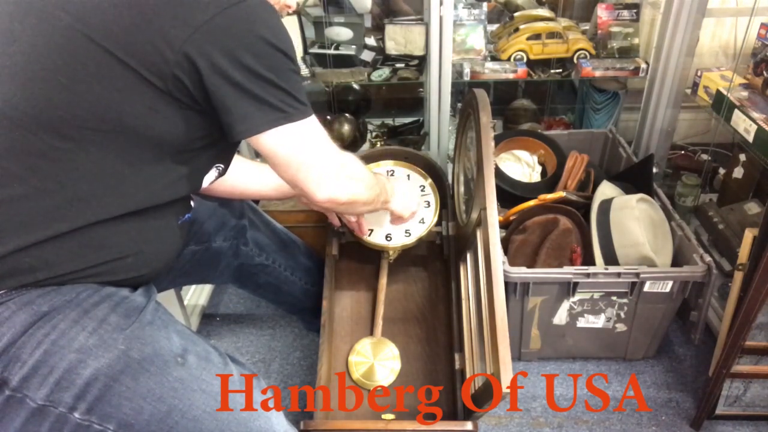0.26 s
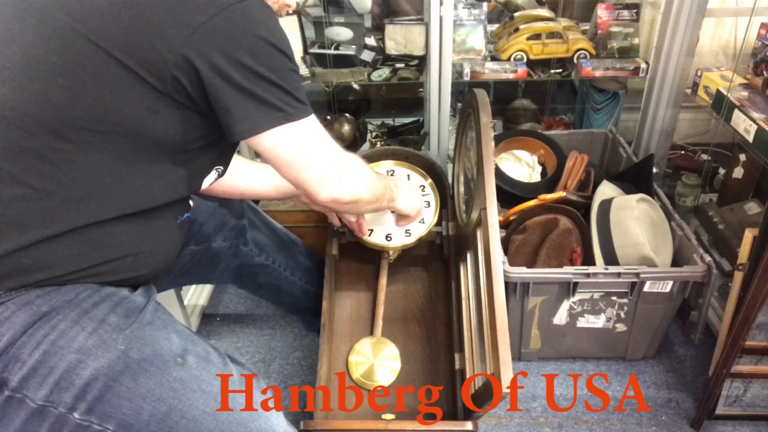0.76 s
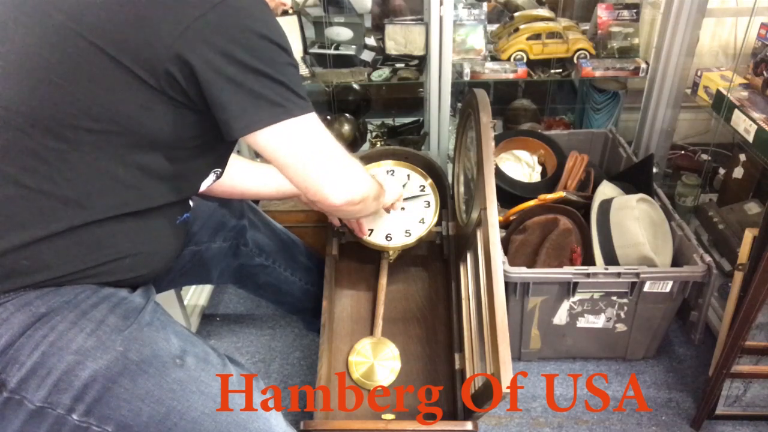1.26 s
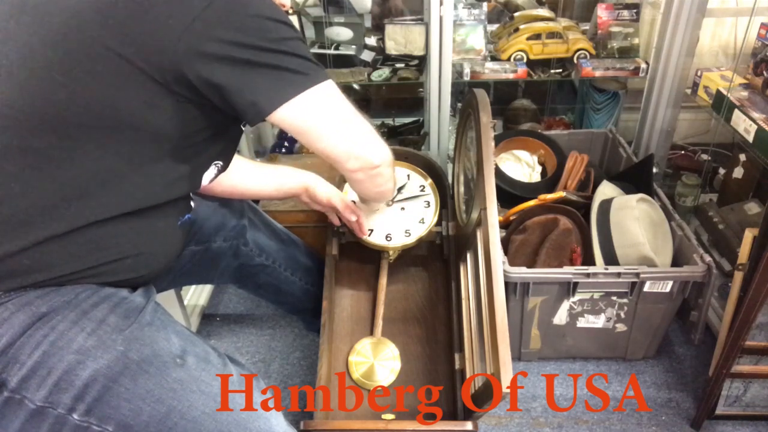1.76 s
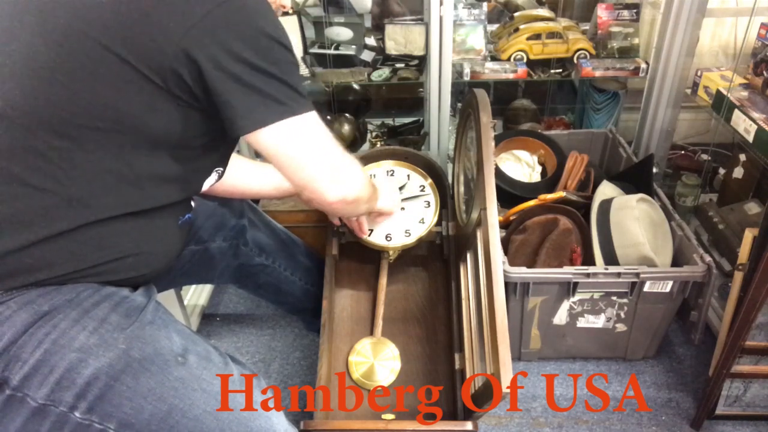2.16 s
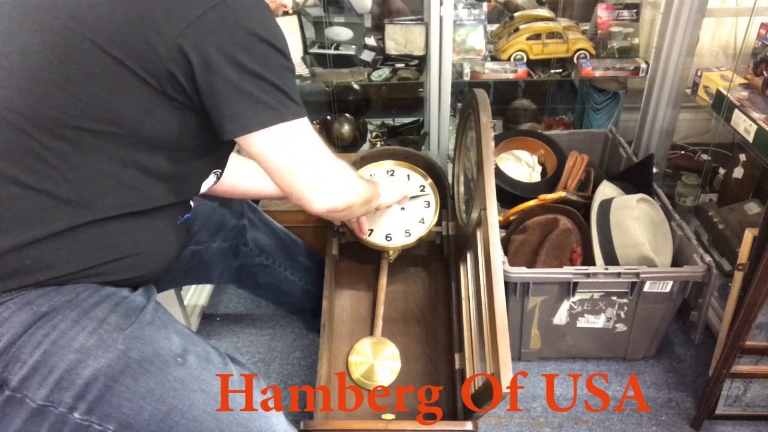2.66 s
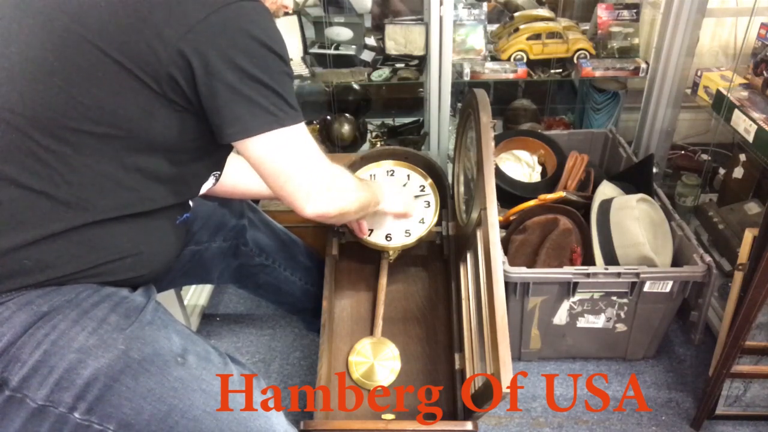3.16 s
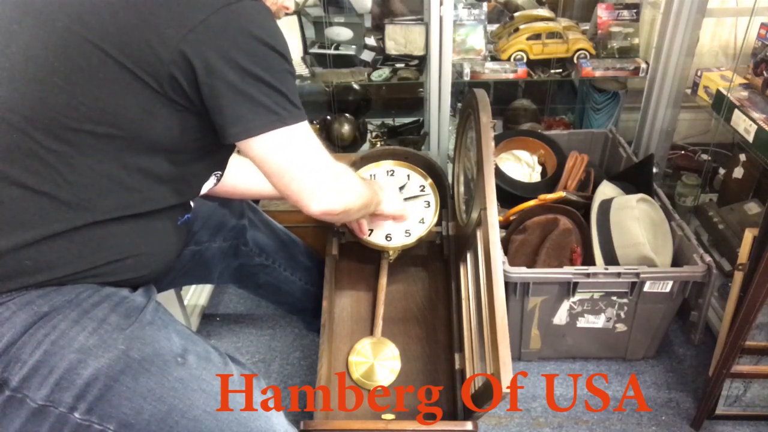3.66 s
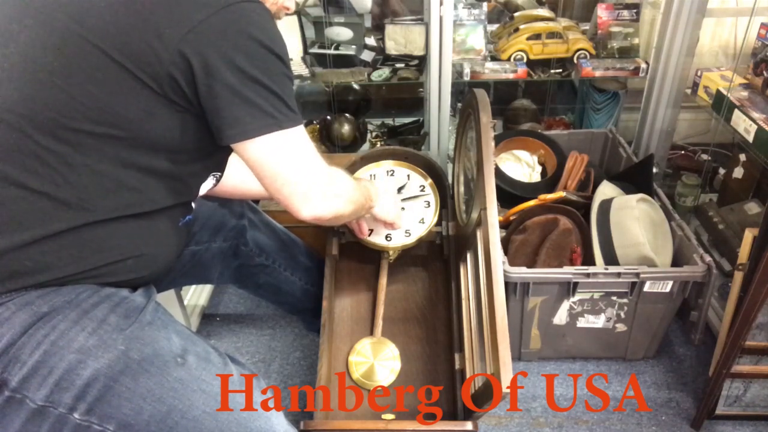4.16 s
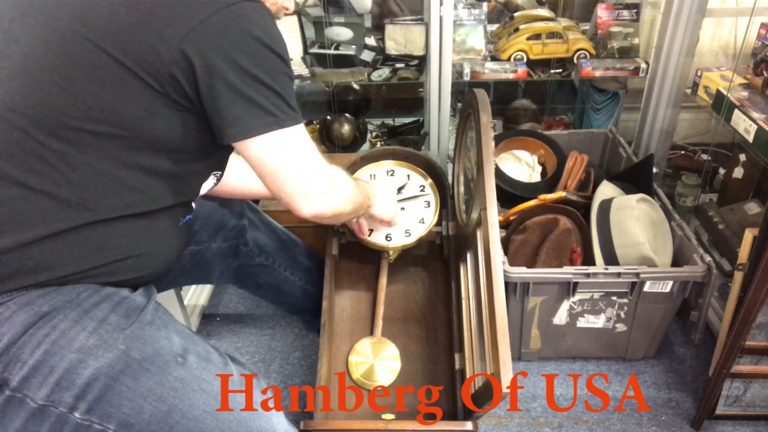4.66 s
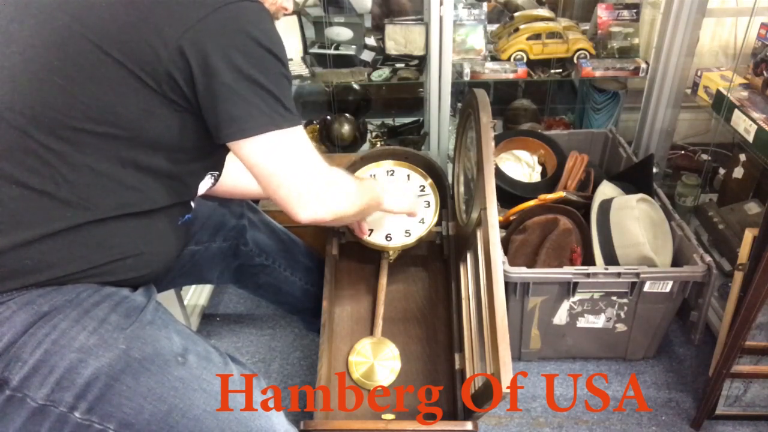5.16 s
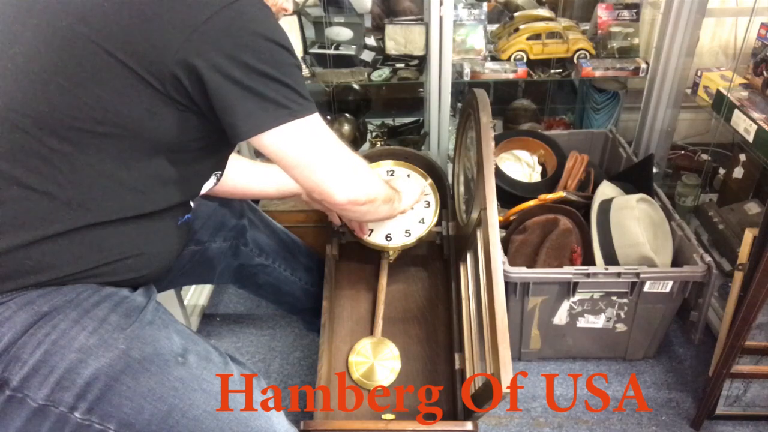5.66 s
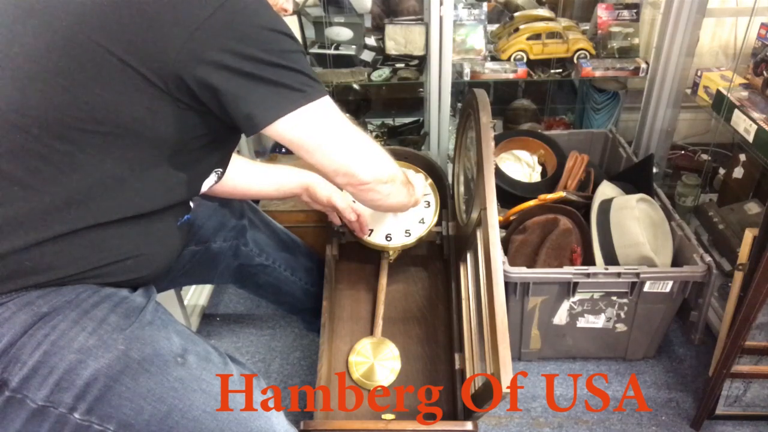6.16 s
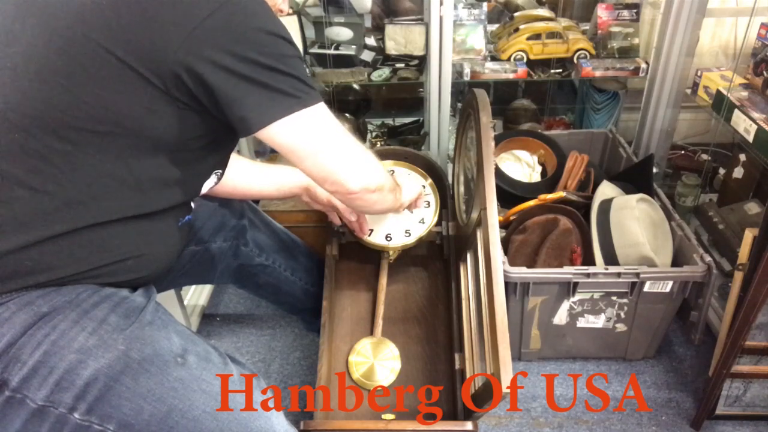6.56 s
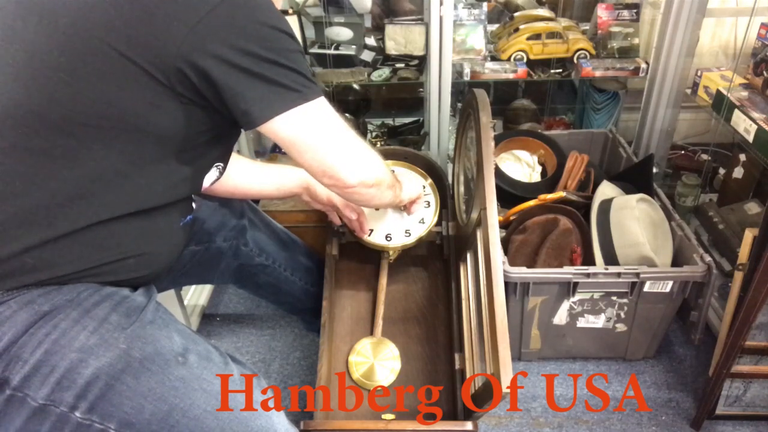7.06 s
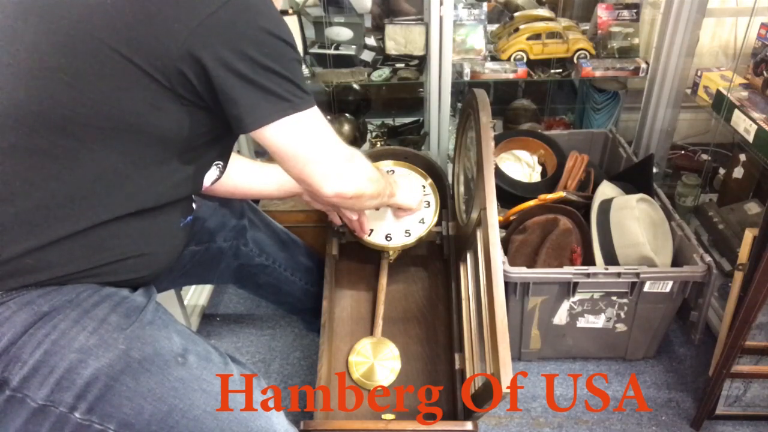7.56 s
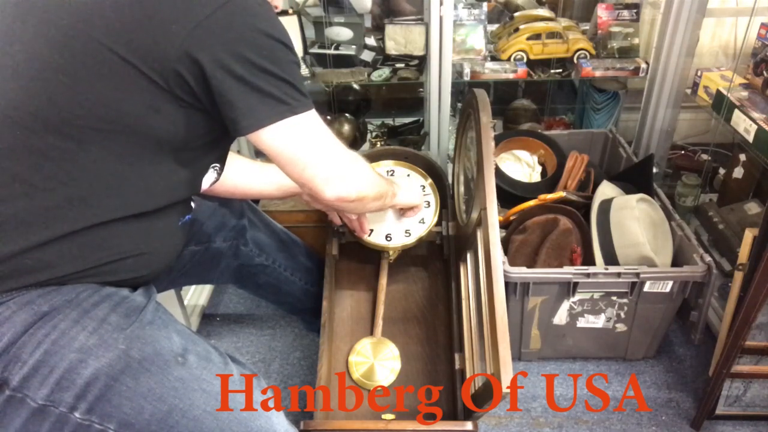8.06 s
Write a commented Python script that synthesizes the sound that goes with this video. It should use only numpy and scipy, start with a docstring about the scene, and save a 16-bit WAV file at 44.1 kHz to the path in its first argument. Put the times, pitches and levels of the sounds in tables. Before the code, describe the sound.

A wooden wall clock is wound with a key in a small room, over a faint ventilation hum. In the first half second come three slow, sharp ratchet clicks with a slight steel ring. Soft thuds and knocks on the hollow case, key taps and a tiny squeak follow until about 1.9 seconds. Then come three quick runs of drier clicks, seven or eight each, at about 2 to 2.4, 2.8 to 3 and 3.5 to 3.8 seconds. From 4 to 7 seconds it is quieter: the loose key taps in its socket, fingers rub lightly, and brief squeaks sound near 5.6 and 6.4 seconds, with a few faint low thuds around 6.5. Two more sharp single clicks come at 7.3 and 7.6 seconds, a wooden knock at 7.8, and light key taps and squeaks just after 8 seconds.

```python
"""Winding a wall clock.

A wooden clock on a shop floor is wound with a key: right arbor, left, then right again.
Each spring's pawl snaps over its ratchet teeth. Between turns the key rattles and squeaks in its
socket, fingers rub and the wrist bumps the case. The small room rings briefly; ventilation hums."""
import sys
import numpy as np
from scipy import signal
from scipy.fft import rfft, irfft, next_fast_len
from scipy.io import wavfile
from scipy.ndimage import uniform_filter1d, map_coordinates

SR = 44100
rng = np.random.default_rng(int(sys.argv[2]) if len(sys.argv) > 2 else 0)


def wav_record(signal):
    """Record a signal, one row per channel, as 16-bit PCM in the file named by sys.argv[1]."""
    frames = np.transpose(np.atleast_2d(signal))
    bounded = np.clip(frames, -1, 1)
    # unit amplitude maps onto the largest positive 16-bit level
    quanta = np.round(bounded * 32767).astype(np.int16)
    wavfile.write(sys.argv[1], SR, quanta)


N = 366471
HIT_SIZE = 2 ** 14
TIME_S = np.arange(N) / SR
HIT_S = np.arange(HIT_SIZE) / SR
HIT_HZ = np.fft.rfftfreq(HIT_SIZE, 1 / SR)

# Table levels are relative; each source adds its own gain.
# ventilation envelopes: (time [s], level [dB])
DRONE_ENVELOPE = [(0.0, -71), (0.23, -44.5), (0.32, -60), (1.64, -60), (2.03, -43), (2.27, -56),
                  (2.59, -50.5), (2.92, -69.5), (3.12, -55.5), (3.98, -63), (4.53, -50), (6.02, -60.5),
                  (6.06, -47), (7.1, -52), (7.36, -65), (7.5, -49.5), (8.19, -56), (8.31, -66)]
RUMBLE_ENVELOPE = [(0, -66), (4, -68), (6.2, -70), (6.45, -48.5), (6.7, -61.5), (8.3, -67)]
# ventilation hum: (frequency [Hz], level [dB])
HUM_LINES = [(99.9, -62.5), (136.2, -62.5), (219.8, -65.5), (391, -73.5), (511, -76.5)]
# pawl snaps, one per tooth: (time [s], level [dB])
RIGHT_SNAPS = [(0.093, -17), (0.248, -17.5), (0.461, -17.5), (7.313, -17.5), (7.575, -17)]
LEFT_SNAPS = [(1.962, -16.5), (2.026, -17.5), (2.076, -19.5), (2.143, -19), (2.209, -19.5), (2.256, -19.5),
              (2.303, -19.5), (2.398, -18), (2.769, -17.5), (2.808, -17), (2.848, -16.5), (2.882, -17),
              (2.91, -18.5), (2.95, -19), (2.992, -19), (3.456, -16.5), (3.565, -15.5), (3.591, -16.5),
              (3.621, -16.5), (3.669, -16.5), (3.715, -16.5), (3.755, -18.5), (3.811, -19.5)]
# case tipping: (time [s], level [dB])
CASE_TIPS = [(0.103, -31), (0.158, -33.5), (0.356, -34.5), (0.607, -29), (0.827, -31.5), (1.836, -33.5),
             (6.391, -43.5), (6.6, -43.5), (6.705, -42.5), (7.869, -40)]
# blows on the case, key in its socket: (time [s], level [dB], hardness [dB of treble])
CASE_KNOCKS = [(0.35, -36, -3), (0.6, -34.5, 3.5), (0.798, -32.5, 6), (1.656, -33, -8), (1.828, -30, 3),
               (4.796, -46.5, -21), (6.384, -39.5, -20), (7.843, -27.5, -1)]
SOCKET_TAPS = [(0.396, -46, 10), (0.941, -40.5, 2.5), (0.955, -40.5, 0), (0.974, -47, 8), (1.331, -35.5, 4),
               (1.365, -36, -1), (1.395, -39, -4), (1.78, -34, -6), (1.795, -34, -10.5), (2.714, -39, -2),
               (4.005, -46, -6), (4.827, -46.5, -11.5), (5.012, -33.5, 1.5), (5.545, -41, 4.5),
               (5.579, -39, 4), (5.71, -42.5, -9), (5.878, -49, 15), (6.371, -48.5, 0), (6.698, -46.5, -11),
               (8.029, -44.5, 2.5), (8.117, -36.5, 5.5), (8.186, -39.5, -1.5), (8.229, -43, 4)]
# key slipping: (time [s], level [dB], pitch [Hz])
KEY_SQUEAKS = [(0.943, -37.5, 1355), (0.968, -45, 1714), (5.546, -49, 1460), (5.577, -40.5, 1364),
               (5.579, -41, 1746), (5.709, -49, 1820), (6.372, -48.5, 1870), (6.696, -57, 1810),
               (8.187, -42.5, 1714), (8.229, -42.5, 1685)]
# noise and contact spectra: (frequency [Hz], level [dB])
AIR_SPECTRUM = [(25, -52), (53, -12.5), (76, -13.5), (110, -18.5), (165, -19.5), (240, -16.5), (360, -24),
                (520, -26), (700, -31.5), (1130, -33), (3000, -44.5), (4800, -49), (6500, -48.5),
                (9000, -56), (15800, -56)]
RIGHT_SPECTRUM = [(150, -39.5), (330, -20.5), (500, -1), (900, -7.5), (1400, -1.5), (2100, -1),
                  (2700, -10.5), (3700, 3.5), (5000, 2), (6800, -1.5), (9600, -6.5), (10500, -16),
                  (12500, -4), (15800, -7.5)]
THUD_SPECTRUM = [(90, -28), (185, -10), (240, -0.5), (300, -6.5), (450, -11.5), (800, -20), (2000, -42.5),
                 (6000, -58.5)]
CASE_SPECTRUM = [(90, -18.5), (220, 0.5), (520, -2.5), (900, -7.5), (1800, -11.5), (3200, -12.5),
                 (6000, -21.5), (10000, -36), (15000, -36)]
RUB_SPECTRUM = [(150, -12), (500, 5), (1000, 2), (1700, -0.5), (3000, -9.5), (6000, -22), (10000, -36),
                (15800, -42)]
KEY_SPECTRUM = [(150, 2), (450, 1), (900, -3), (1600, -3.5), (2400, -10), (4500, -11), (7000, -20),
                (10000, -29.5), (15000, -31)]
LEFT_SPECTRUM = [(150, -18), (330, -12.5), (500, -6.5), (900, 0), (1400, -5), (2100, 0), (3000, 4.5),
                 (4600, 1), (5800, 0), (7400, 0.5), (9600, -5.5), (10500, -10), (12500, -0.5), (15800, -5)]
RUMBLE_SPECTRUM = [(20, -36.5), (42, -14), (56, 4.0), (75, -6.5), (130, -29.5), (400, -70)]
# ringing modes: (frequency [Hz], level [dB], T60 [s])
RIGHT_PAWL_MODES = [(405, -19, .1), (517, -9, .09), (1010, -20, .12), (1290, -18, .07), (1530, -19, .18),
                    (1670, -14, .14), (1910, -11, .08), (2100, -12, .07), (3480, -13, .08), (3740, -13, .1),
                    (4160, -18, .14), (4860, -13, .1), (5020, -7, .07), (5085, -9, .13), (5140, -10, .18),
                    (5215, -9, .14), (6130, -17, .08), (9150, -11, .05), (9790, -14, .06),
                    (13900, -15, .06)]
WOOD_MODES = [(228, -11, .15), (250, -14, .12), (284, -8, .16), (385, -15, .1), (410, -11, .1),
              (518, -4, .09)]
SOCKET_MODES = [(500, -5.5, .08), (1408, -22, 0.029), (1700, -12, 0.023)]
LEFT_PAWL_MODES = [(278, -21, .13), (400, -19, .08), (519, -14, .1), (940, -14, .08), (1008, -17, .12),
                   (1697, -12, .08), (2200, -12.5, .07), (2530, -16, .1), (2780, -11, .08), (2900, -3, .02),
                   (3026, -10, .08), (3150, -6.5, .025), (3530, -16, .07), (3740, -17, .1),
                   (4395, -12, .07), (4496, -15, .09), (4620, -1, .02), (4676, -11, .07), (5250, -9, .03)]
# room decay: (frequency [Hz], T60 [s])
ROOM_DECAY = [(150, 0.51), (500, 0.51), (1500, 0.35), (4500, 0.27), (9000, 0.25), (15000, 0.19)]


def amp(db):
    """Decibels to gain."""
    return 10 ** (np.asarray(db) / 20)


def unit(x):
    """Scale to rms 1."""
    return x / np.sqrt(np.mean(x ** 2) + 1e-20)


def along(points, hz):
    """Interpolate (frequency [Hz], value) points on a log axis."""
    knots_hz, values = np.transpose(points)
    return np.interp(np.log(hz + 1), np.log(knots_hz), values)


def wobble(rate_hz, size=N):
    """Smooth random curve, rate_hz knots per second."""
    knots = rng.standard_normal(int(size * rate_hz / SR) + 4)
    return map_coordinates(knots, [TIME_S[:size] * rate_hz])


def filtered(x, gain):
    """Zero-phase filter with response gain(hz)."""
    size = next_fast_len(N + HIT_SIZE)
    return irfft(rfft(x, size) * gain(np.fft.rfftfreq(size, 1 / SR)), size)[:N]


def noise(spectrum):
    """Steady shaped noise, rms 1."""
    return unit(filtered(rng.standard_normal(N), lambda hz: amp(along(spectrum, hz))))


def minimum_phase(db):
    """Causal response with these levels on HIT_HZ."""
    cepstrum = irfft(np.log(amp(db)))
    cepstrum[1:HIT_SIZE // 2] *= 2
    cepstrum[HIT_SIZE // 2 + 1:] = 0
    return np.exp(rfft(cepstrum))


def add(track, start_s, sound):
    """Mix a sound into the track."""
    part = track[max(round(start_s * SR), 0):][:len(sound)]
    part += sound[:len(part)]


def in_room(hit, wet_db):
    """Hit plus room tail; treble dies first."""
    hz, time_s, bins = signal.stft(rng.standard_normal(HIT_SIZE), SR, nperseg=256)
    decay = amp(-60 * time_s / along(ROOM_DECAY, hz)[:, None])
    tail = signal.istft(bins * decay, SR, nperseg=256)[1]
    tail *= 1 - np.exp(-(HIT_S / 0.0044) ** 2)
    return hit + amp(wet_db) * signal.fftconvolve(hit, tail / np.linalg.norm(tail))[:HIT_SIZE]


def strike(response_db, chatter, rise_s, t60_s, edge_t60_s, lag_s):
    """One contact: decaying chatter, shortest in the treble; loudest 5 ms at rms 1."""
    attack = 1 - np.exp(-(HIT_S / rise_s) ** 2)
    body, edge = (rfft(chatter * attack * amp(-60 * HIT_S / decay_s)) / np.sqrt(decay_s)
                  for decay_s in (t60_s, edge_t60_s))
    treble = along([(1500, 0), (11000, 1)], HIT_HZ)
    # bending waves are slower in the bass; lag_s is their delay at 1 kHz
    bending = np.exp(-4j * np.pi * lag_s * np.sqrt(1000 * HIT_HZ))
    hit = irfft(((1 - treble) * body + treble * edge) * minimum_phase(response_db) * bending)
    return hit / np.sqrt(uniform_filter1d(hit ** 2, size=220).max())


def ring(modes, tilt, rise_s):
    """Modes as decaying sines, varied per blow; low ones build up slower (rise_s at 1 kHz)."""
    total = np.zeros(HIT_SIZE)
    for hz, db, t60_s in modes:
        age_s = HIT_S[HIT_S < t60_s]
        swell = 1 - np.exp(-(age_s / rise_s) ** 2 * hz / 1000)
        level_db = db + along(tilt, hz) + rng.normal(0, 0.84) - 60 * age_s / t60_s
        total[:len(age_s)] += amp(level_db) * swell * np.sin(2 * np.pi * (hz * age_s + rng.random()))
    return total


def contacts(blows, spectrum, modes, tilt_hz, body_db, edge_db, scatter_db, thinning,
             ring_db, repeat_share, wet_db, **timing):
    """Repeated blows on one object; harder ones have more edge and a thinner body."""
    track = np.zeros(N)
    # the same parts meet each time, so some chatter repeats
    repeated = np.sqrt(repeat_share) * rng.standard_normal(HIT_SIZE)
    for start_s, db, *hardness_db in blows:
        hard_db = (hardness_db[0] if hardness_db else 0) + scatter_db * rng.standard_normal()
        chatter = repeated + np.sqrt(1 - repeat_share) * rng.standard_normal(HIT_SIZE)
        tilt = list(zip(tilt_hz, [body_db - thinning * hard_db, 0, 0, edge_db + hard_db]))
        snap = strike(along(spectrum, HIT_HZ) + along(tilt, HIT_HZ), chatter, **timing)
        ringing = amp(ring_db) * ring(modes, tilt, rise_s=0.0026)
        add(track, start_s, amp(db) * in_room(snap + ringing, wet_db))
    return track


def ventilation():
    """Air noise, fluttering deep drone, hum lines and a low rumble that swells once."""
    def tone(hz, waver_rad):
        return np.sqrt(2) * np.sin(2 * np.pi * hz * TIME_S + waver_rad * wobble(5.2))

    drone_db = np.interp(TIME_S, *np.transpose(DRONE_ENVELOPE)) + 3.5 * wobble(rate_hz=9)
    drone = amp(drone_db - 1.5) * tone(hz=72.4, waver_rad=0.71)
    hum = sum(amp(db + 1.1 * wobble(3.01)) * tone(hz, waver_rad=0.44) for hz, db in HUM_LINES)
    rumble = amp(np.interp(TIME_S, *np.transpose(RUMBLE_ENVELOPE))) * noise(RUMBLE_SPECTRUM)
    return amp(-58) * noise(AIR_SPECTRUM) + drone + hum + rumble


def right_pawl():
    """Slow single clicks; the steel pawl rings on near 5 kHz."""
    return amp(-8) * contacts(
        RIGHT_SNAPS, RIGHT_SPECTRUM, RIGHT_PAWL_MODES, tilt_hz=(900, 2000, 6000, 10000),
        body_db=2.2, edge_db=5.5, scatter_db=2.04, thinning=0.3,
        ring_db=-3.5, repeat_share=0.26, wet_db=-9.5,
        rise_s=0.0024, t60_s=0.077, edge_t60_s=0.021, lag_s=0.001152)


def case_thuds(settle_s=0.035, settle_loss_db=12.5):
    """The case tips under the hands with a low thud, then settles back more softly."""
    track = np.zeros(N)
    settles = [(start_s + settle_s, db - settle_loss_db) for start_s, db in CASE_TIPS]
    for start_s, db in CASE_TIPS + settles:
        thud = strike(along(THUD_SPECTRUM, HIT_HZ), rng.standard_normal(HIT_SIZE),
                      rise_s=0.0011, t60_s=0.1, edge_t60_s=0.04, lag_s=0.001017)
        thud += amp(11) * ring(WOOD_MODES, THUD_SPECTRUM, rise_s=0.0037)
        add(track, start_s, amp(db - 7.5) * in_room(thud, wet_db=-7))
    return track


def case_knocks():
    """The wrist bumps the hollow wooden case; its low modes ring."""
    return amp(-6.5) * contacts(
        CASE_KNOCKS, CASE_SPECTRUM, WOOD_MODES, tilt_hz=(350, 600, 1300, 3500),
        body_db=-0.2, edge_db=-8, scatter_db=1.4, thinning=0.16,
        ring_db=5, repeat_share=0.05, wet_db=-6.5,
        rise_s=0.00081, t60_s=0.077, edge_t60_s=0.048, lag_s=0.00044)


def dial_rubs(lag_s=0.011, half_width_s=0.016, gain_db=-19):
    """Fingers and key slide on the dial at each tap or knock: tiny slips under a pressure swell."""
    pressure = sum(amp(db + gain_db) * np.exp(-((TIME_S - start_s - lag_s) / half_width_s) ** 2)
                   for start_s, db, _ in SOCKET_TAPS + CASE_KNOCKS)
    slips = noise(RUB_SPECTRUM) * amp(1.9 * wobble(rate_hz=350))
    return pressure * unit(slips)


def key_taps():
    """The loose key taps the arbor as the grip changes."""
    return amp(-8) * contacts(
        SOCKET_TAPS, KEY_SPECTRUM, SOCKET_MODES, tilt_hz=(700, 1300, 2180, 5020),
        body_db=-0.5, edge_db=-7, scatter_db=2.3, thinning=0.31,
        ring_db=-7.5, repeat_share=0.28, wet_db=-7.5,
        rise_s=0.00072, t60_s=0.12, edge_t60_s=0.05, lag_s=0.000594)


def key_squeaks(peak_s=0.0038, glide_share=0.023):
    """Brass sticks and slips: short, unsteady, slightly rising tones."""
    track = np.zeros(N)
    age = HIT_S / peak_s
    swell = age * np.exp(1 - age)
    for start_s, db, hz in KEY_SQUEAKS:
        pitch_hz = hz * (1 + glide_share * np.tanh(age / 4) + 0.031 * wobble(380, size=HIT_SIZE))
        squeak = swell * np.sin(2 * np.pi * np.cumsum(pitch_hz) / SR)
        add(track, start_s, amp(db - 1.5) * in_room(squeak, wet_db=-10))
    return track


def left_pawl(dulling_db_per_db=0.74, hurry_db=4.5, hurry_gap_s=0.027):
    """Three quick runs of drier clicks near 3 and 4.6 kHz; strong or hurried ones sound fuller."""
    start_s, db = np.transpose(LEFT_SNAPS)
    # a stronger snap shakes more of the movement
    hardness_db = -dulling_db_per_db * (db - db.mean())
    hardness_db -= hurry_db * np.exp(-np.diff(start_s, prepend=0) / hurry_gap_s)
    return amp(-9) * contacts(
        zip(start_s, db, hardness_db), LEFT_SPECTRUM, LEFT_PAWL_MODES, tilt_hz=(900, 2000, 6000, 10000),
        body_db=1.74, edge_db=-0.5, scatter_db=0.7, thinning=2.0,
        ring_db=-1, repeat_share=0.43, wet_db=-8.5,
        rise_s=0.0012, t60_s=0.069, edge_t60_s=0.034, lag_s=0.00141)


def scene():
    """Mono mix of all sources."""
    pawls = right_pawl() + left_pawl()
    handling = key_taps() + key_squeaks() + dial_rubs() + case_knocks() + case_thuds()
    return (pawls + handling + ventilation())[None]


def record(dry):
    """Steep low-pass."""
    cutoff_hz = 15900
    return np.array([filtered(channel, lambda hz: 1 / np.sqrt(1 + (hz / cutoff_hz) ** 200))
                     for channel in dry])


dry = scene()
out = record(dry)
wav_record(out)
```